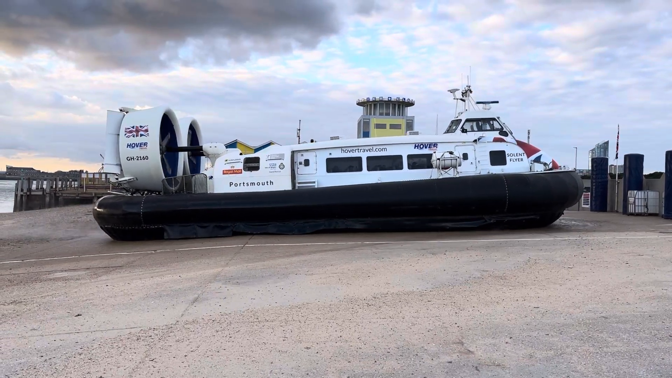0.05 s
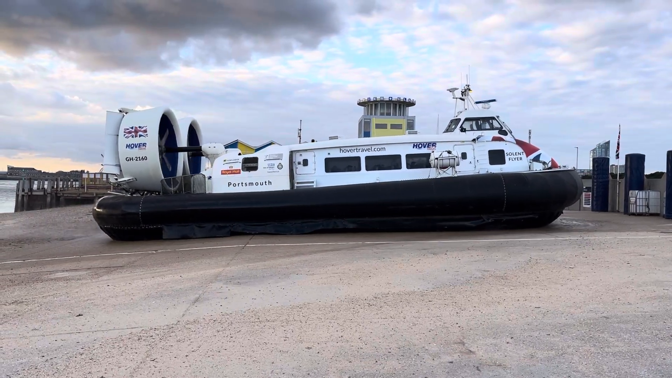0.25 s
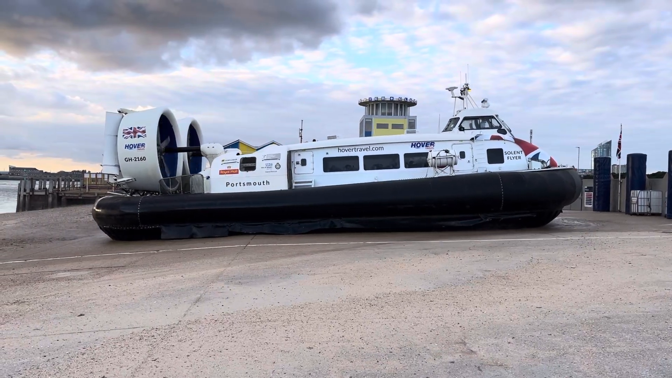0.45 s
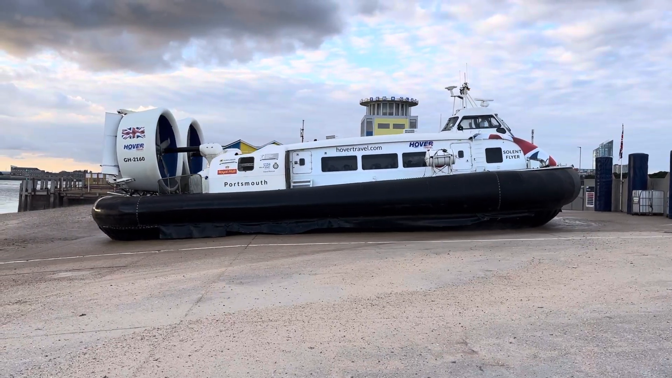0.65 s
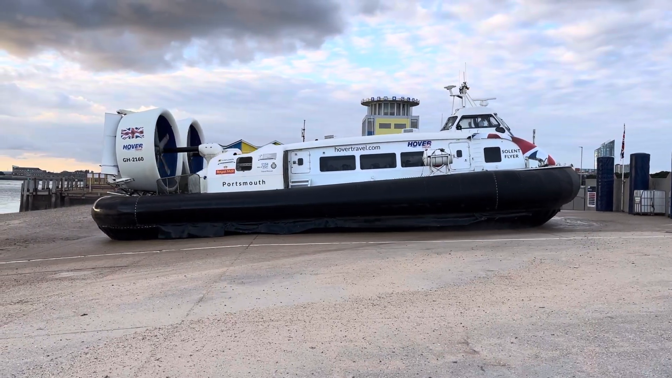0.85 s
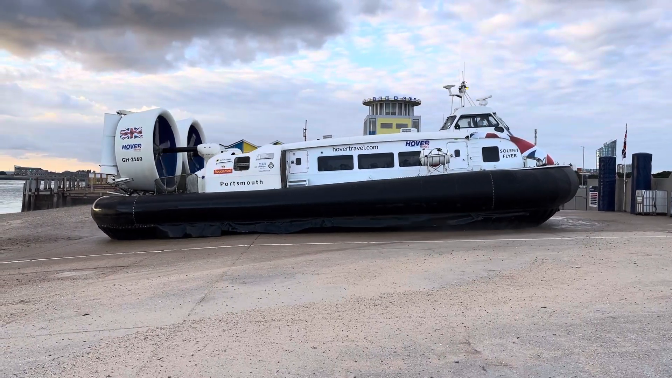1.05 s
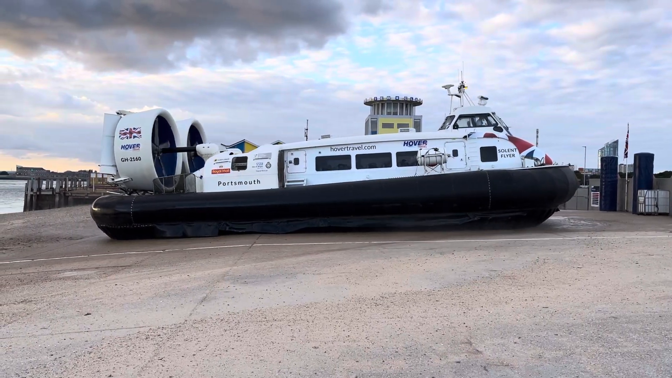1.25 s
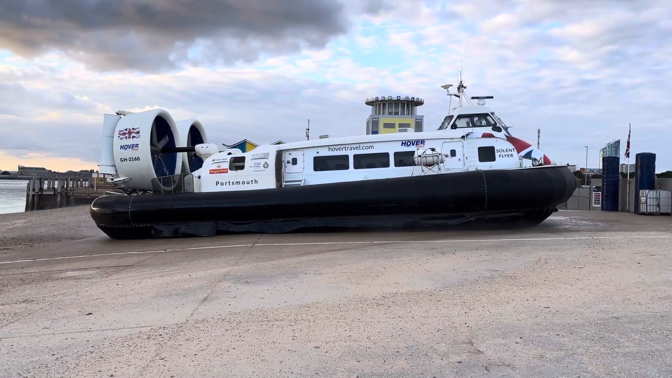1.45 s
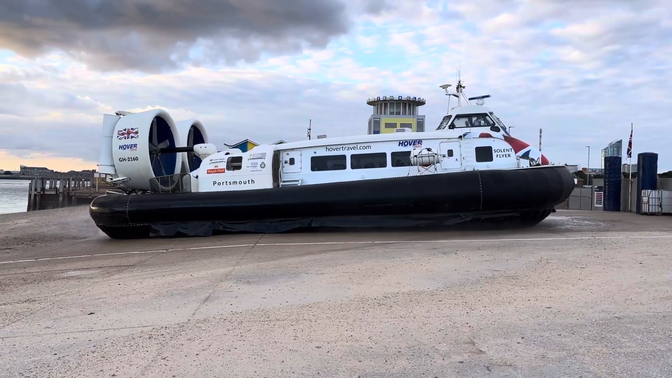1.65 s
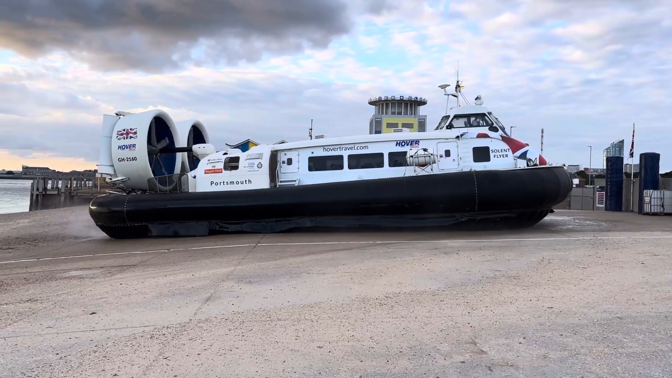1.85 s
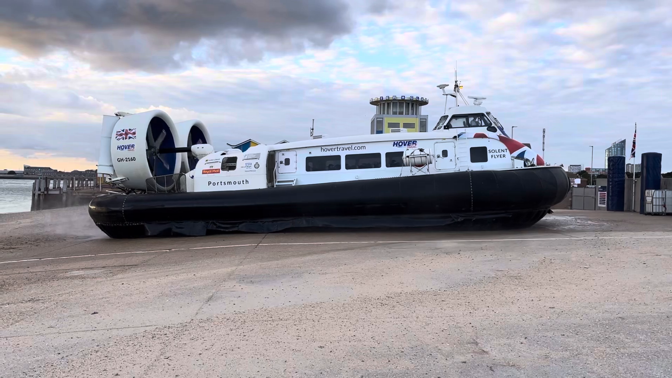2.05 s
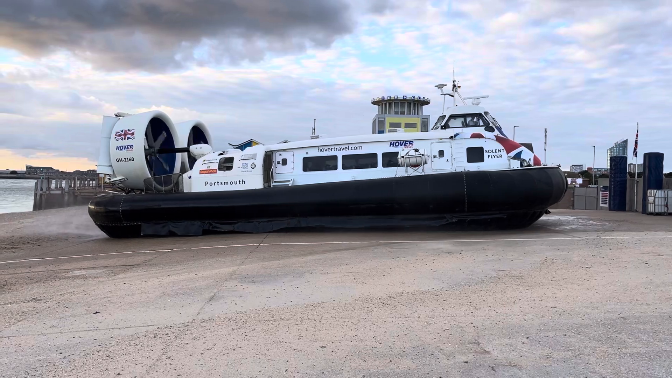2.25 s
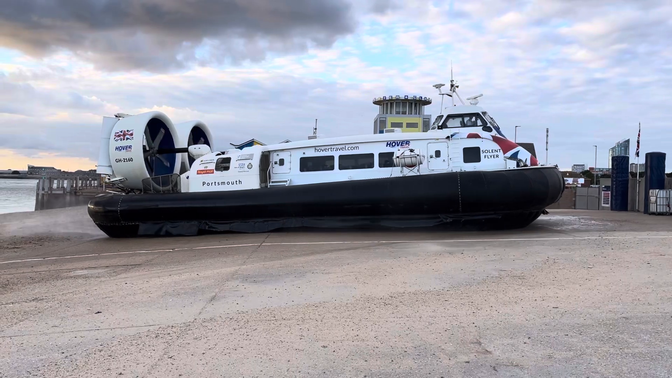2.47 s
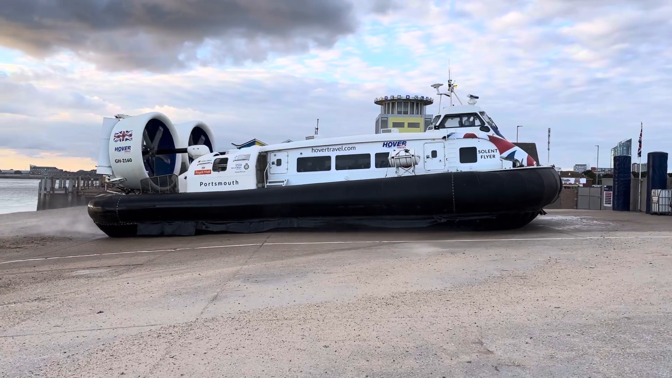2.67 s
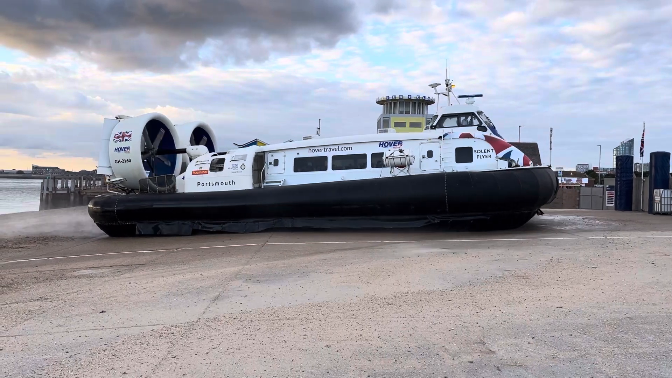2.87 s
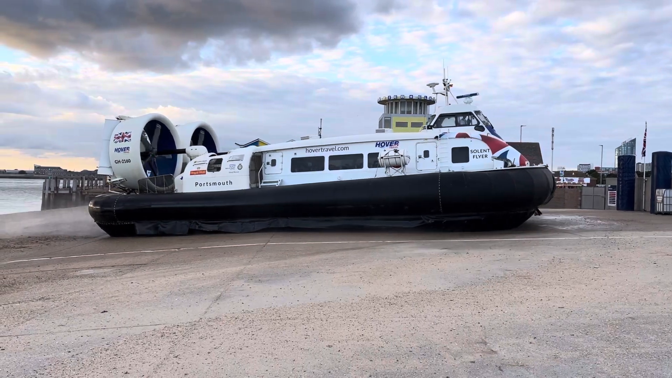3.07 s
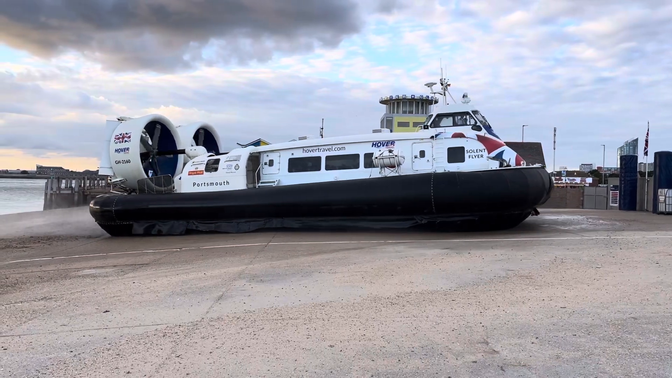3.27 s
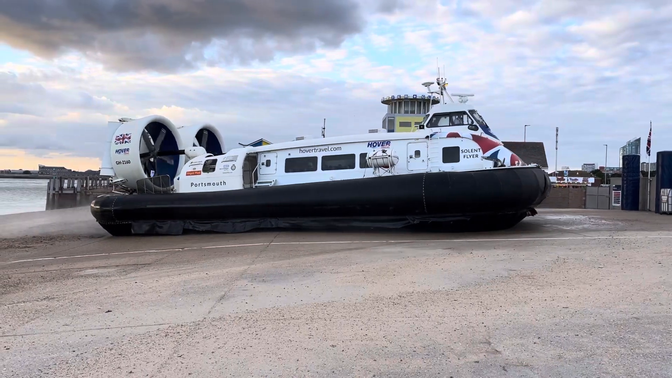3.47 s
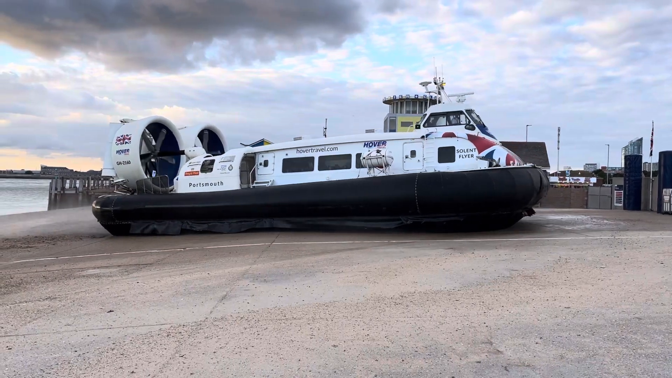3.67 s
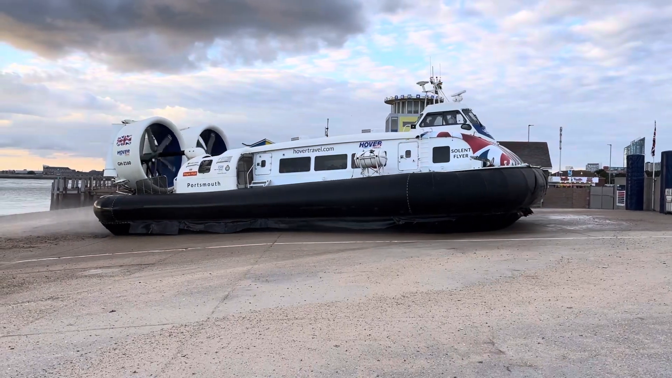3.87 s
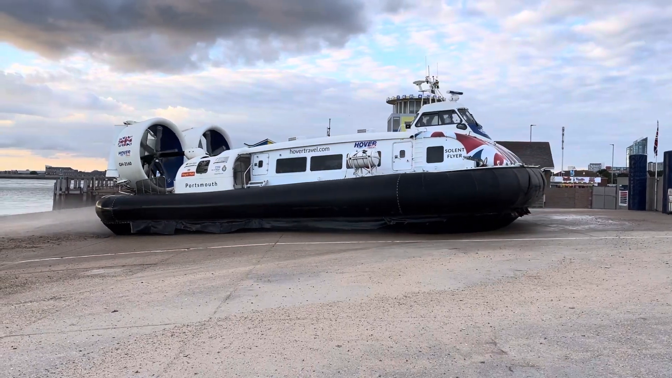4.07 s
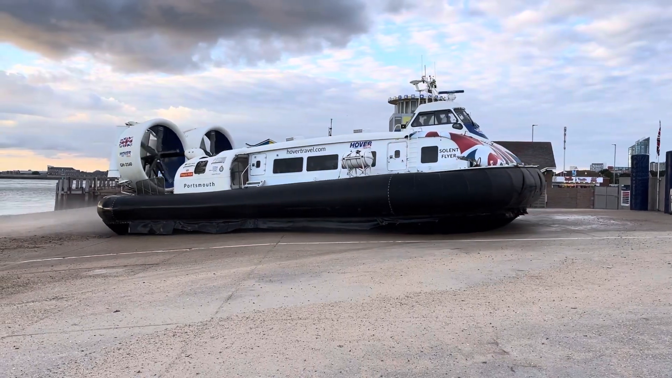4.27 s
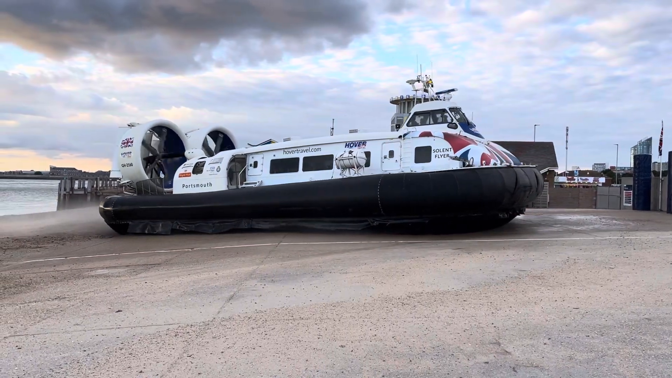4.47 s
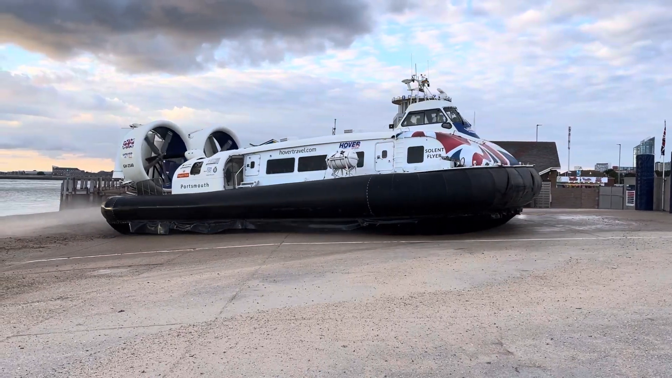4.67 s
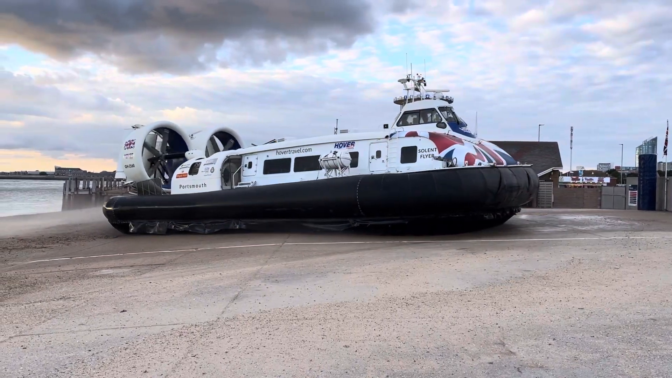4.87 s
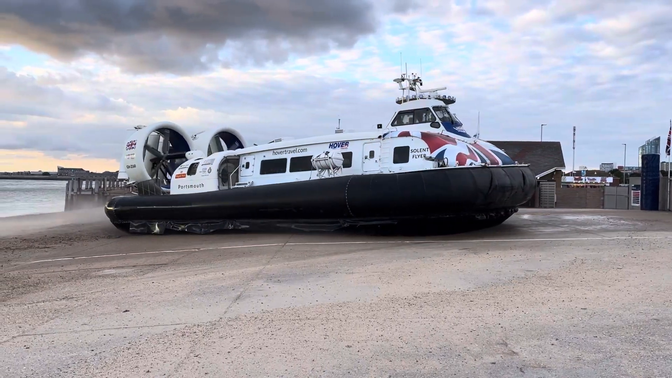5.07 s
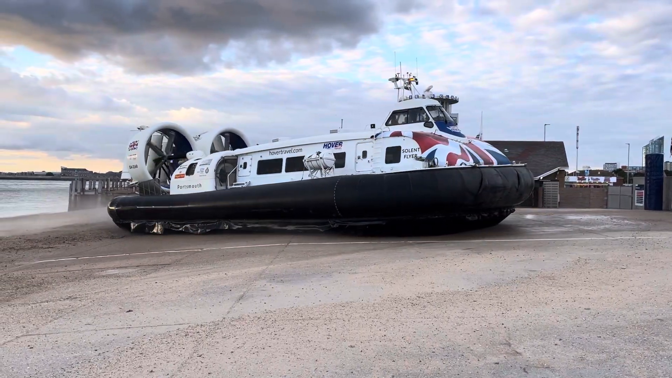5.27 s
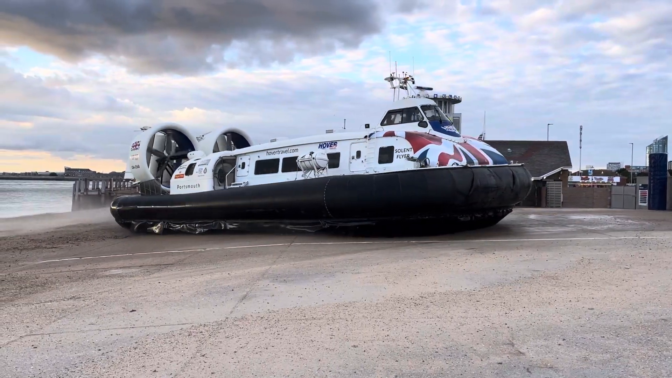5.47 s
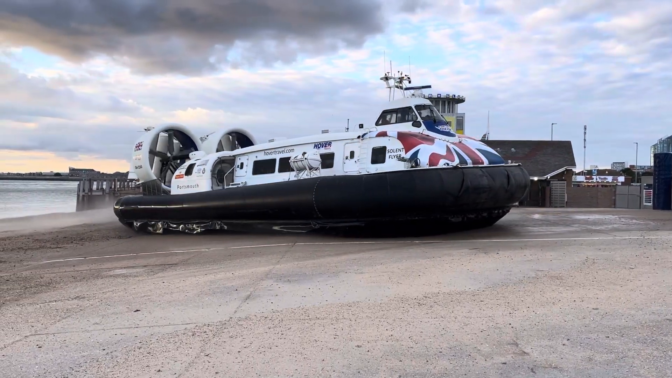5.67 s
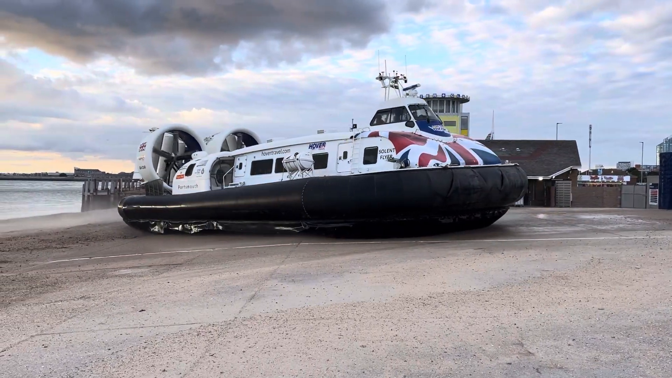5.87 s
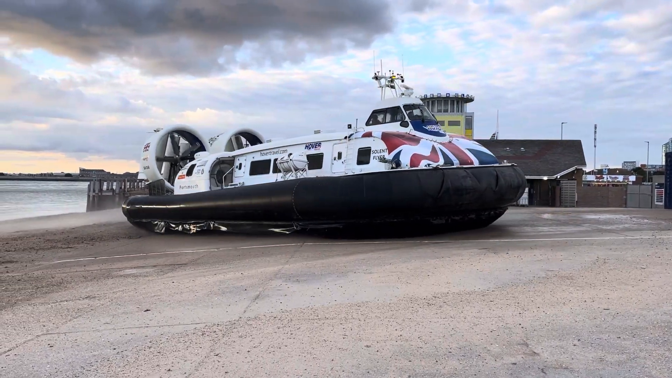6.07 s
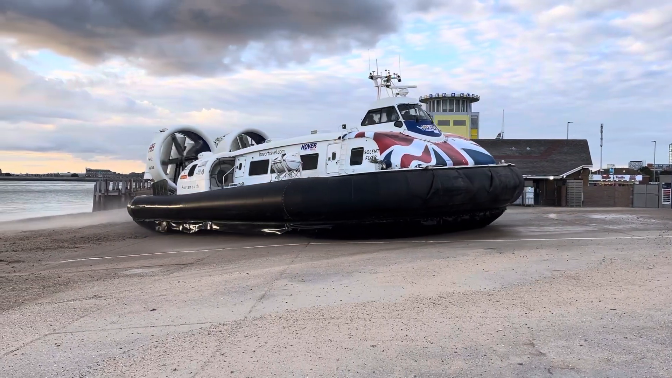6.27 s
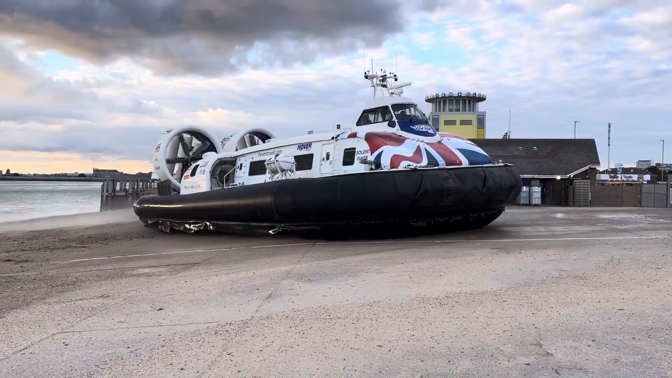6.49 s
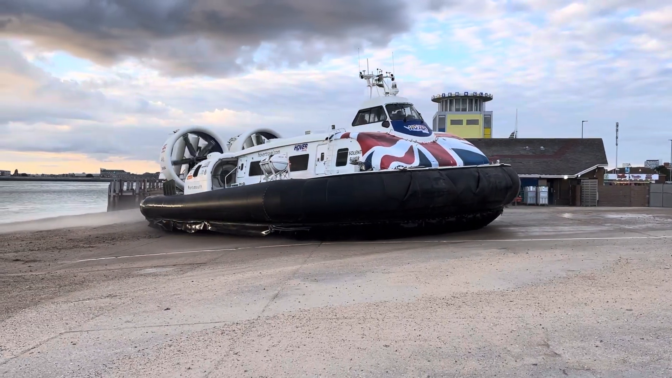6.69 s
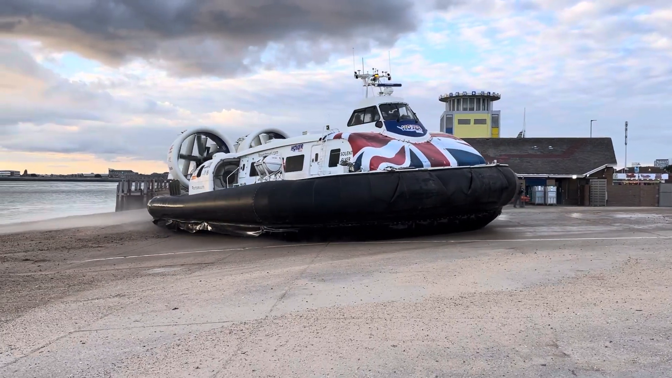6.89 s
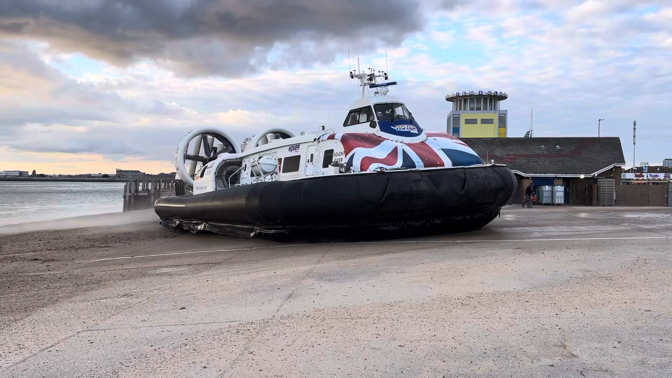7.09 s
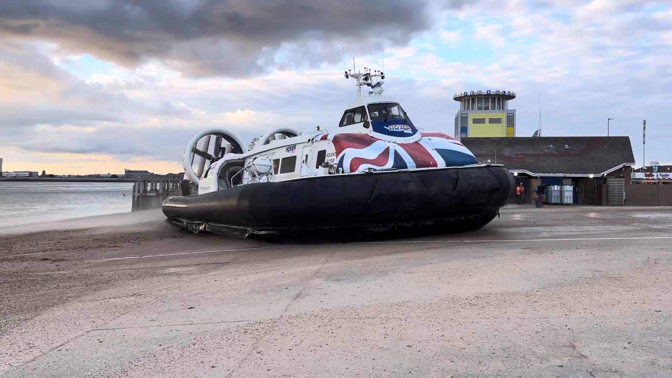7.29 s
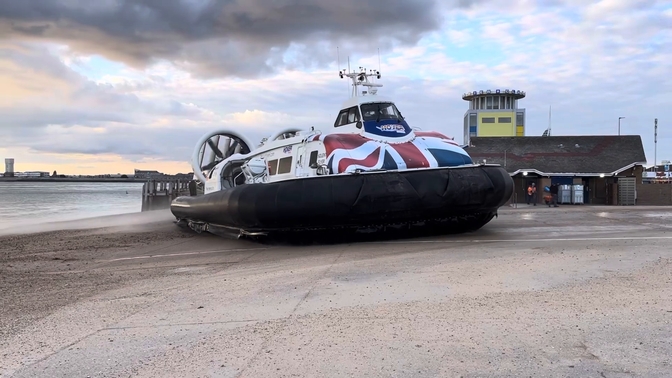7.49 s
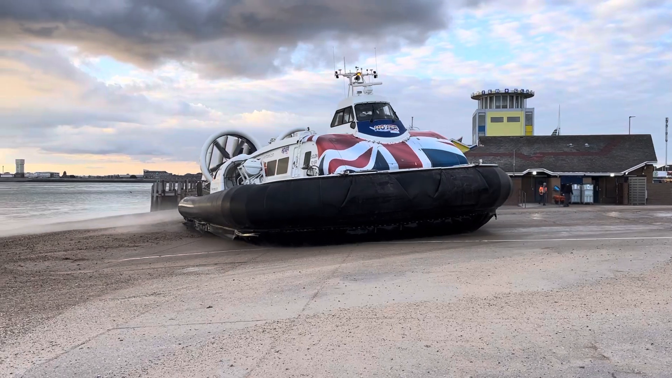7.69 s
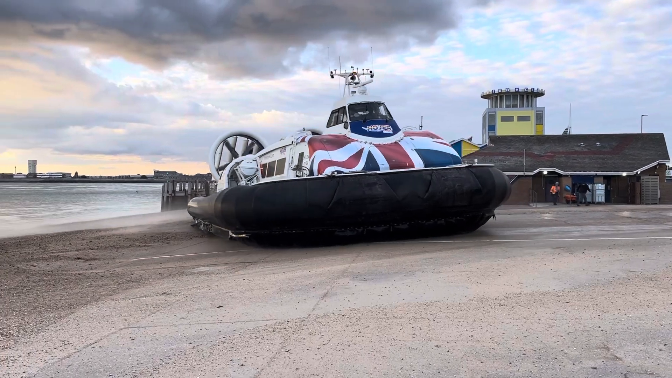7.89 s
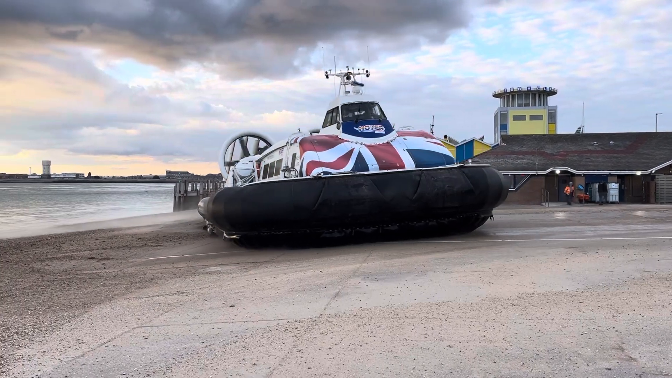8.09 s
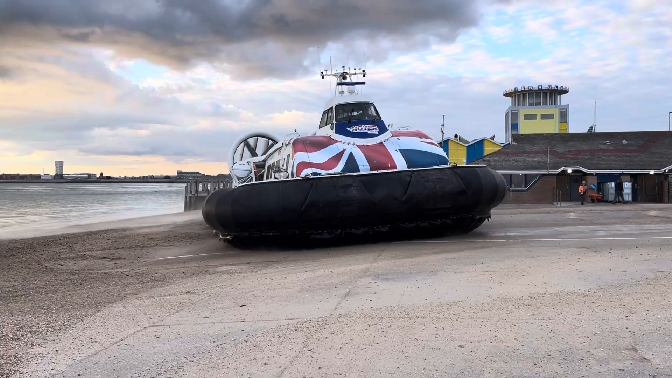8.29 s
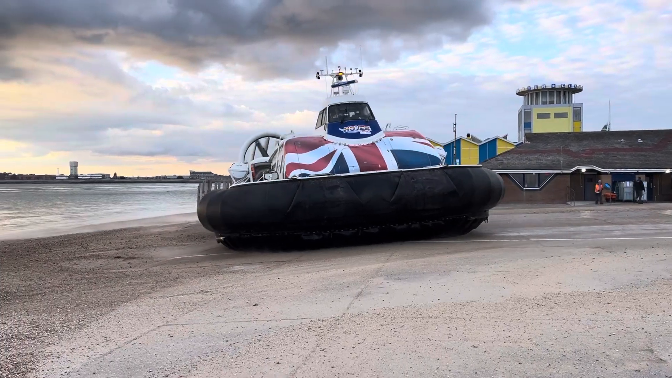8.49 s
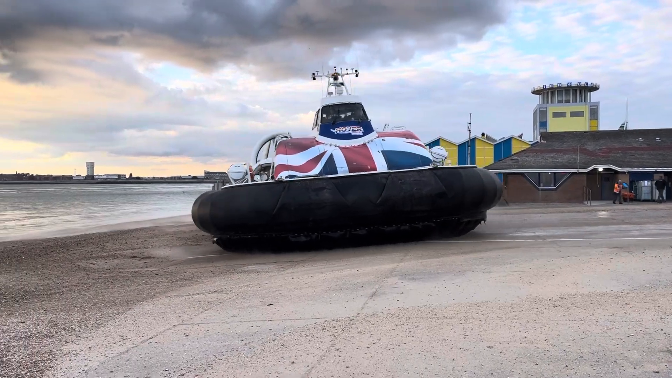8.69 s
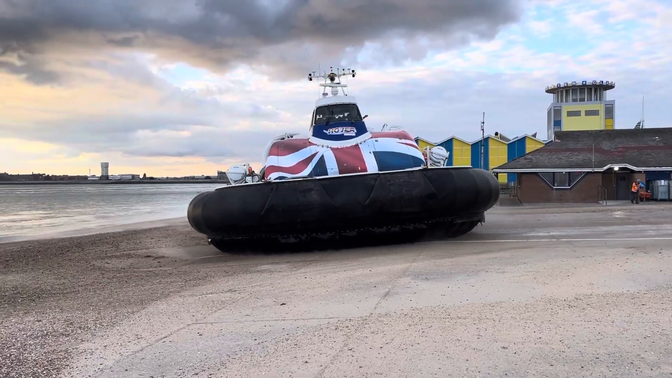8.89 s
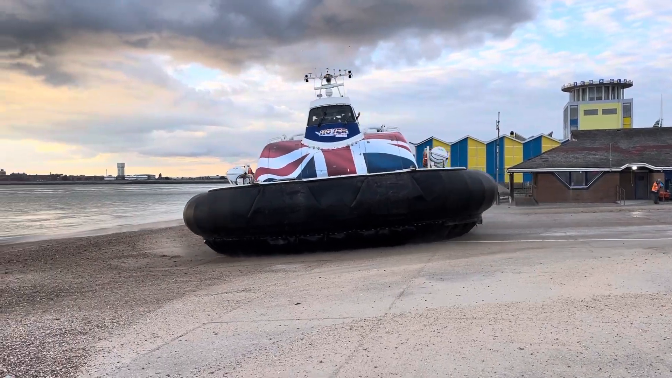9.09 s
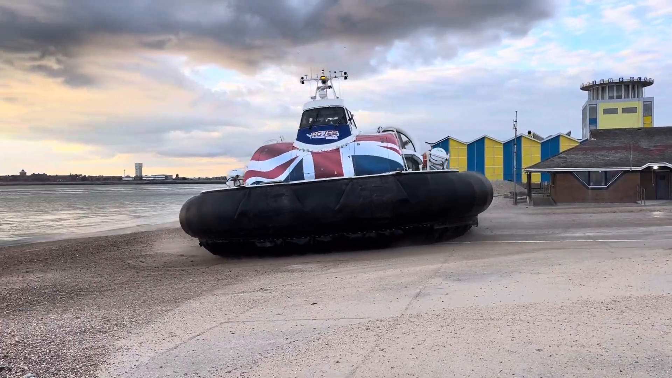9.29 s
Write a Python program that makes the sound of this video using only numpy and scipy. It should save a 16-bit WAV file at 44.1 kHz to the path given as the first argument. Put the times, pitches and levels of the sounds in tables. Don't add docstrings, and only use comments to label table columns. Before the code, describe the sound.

Continuous, loud hovercraft noise in the open, heard from the shingle nearby through a small stereo device with dulled extreme treble. Low engine tone, buzzing propeller harmonics and a faint lift fan whine waver within dense rushing air. Early thrust surges give way to broad skirt hisses; the exhaust fades behind the hull, then comes back as spray rises.

```python
import sys
import numpy as np
from scipy import signal
from scipy.fft import rfft, irfft
from scipy.io import wavfile
from scipy.ndimage import uniform_filter1d

SR = 44100
rng = np.random.default_rng(int(sys.argv[2]) if len(sys.argv) > 2 else 0)


def master_out(mix):
    frames = np.transpose(np.atleast_2d(mix))
    ceiling = np.clip(frames, -1, 1)
    pcm = np.round(ceiling * 32767).astype(np.int16)
    wavfile.write(sys.argv[1], SR, pcm)


def invert_db(level):
    return 10 ** (np.asarray(level, dtype=float) / 20)


N = 411894


def in_time(rows):
    s, *columns = np.transpose(rows)
    return [np.interp(np.arange(N) / SR, s, column) for column in columns]


def at_hz(table, hz, axis=1):
    table = np.array(table)
    return np.interp(np.log(hz + 1), np.log(table[:, 0]), table[:, axis])


def drift(rate):
    r = np.exp(-80 * np.pi * rate / SR)
    coarse = rng.standard_normal(N // 40 + 4002)
    slow = signal.lfilter([1], [1, -2 * r, r * r], coarse)[4000:]
    return np.interp(np.arange(N) / 40, np.arange(len(slow)), slow / slow.std())


def swells(rows, s):
    return sum(height * np.exp(-.5 * ((s - centre) / width) ** 2) for centre, width, height in rows)


def tone(hz, level_db, waver_db, smear):
    phase = 2 * np.pi * (np.cumsum(hz) / SR + rng.random()) + smear * drift(3.9)
    height = np.sqrt(2) * invert_db(level_db + waver_db * drift(5.8))
    return height * np.sin(phase)


# (level broadside [dB], level bow on [dB])
TONE_FLOORS = [(-34, -43), (-30, -33), (-36, -47), (-28, -38), (-38.5, -43), (-49.5, -51), (-39.5, -37.5)]
# (time [s], width [s], level [dB])
TONE_BEAMS = [
    [(.1, 0.21, -28.5), (3.4, 0.12, -25), (5.95, 0.2, -33)],
    [(1.7, 0.22, -23), (3.35, 0.19, -20), (4.4, 0.11, -20), (5.3, 0.14, -29), (7.3, 0.19, -28)],
    [(.6, 0.46, -22.5), (1.2, 0.12, -24.5), (2.1, 0.13, -21), (2.7, 0.34, -19), (3.7, .12, -22),
     (4.6, 0.22, -25.5), (5.25, 0.095, -26.5), (6.1, 0.25, -22), (7.25, 0.1, -27)],
    [(1.28, 0.14, -24), (3.97, 0.12, -21), (5.0, 0.16, -27.5), (6.91, 0.33, -27.5), (.5, .15, -26.5)],
    [(2.37, 0.14, -30), (3.85, 0.34, -25.5), (6.9, 0.26, -31), (.1, 0.15, -33)],
    [(2.8, 0.58, -32), (3.9, .25, -41)],
    [(2.6, 0.17, -31), (3.75, 0.18, -30.5), (4.5, .15, -32), (6.2, 0.67, -31.5), (7.5, 0.49, -35.5),
     (8.8, 0.24, -32.5)],
]


def beamed(index):
    s = np.arange(0, N, 64) / SR
    floor_db = np.interp(s, [0, N / SR], TONE_FLOORS[index])
    beams = [(centre, width, invert_db(2 * db)) for centre, width, db in TONE_BEAMS[index]]
    power = invert_db(2 * floor_db) + swells(beams, s)
    return np.interp(np.arange(N) / SR, s, 10 * np.log10(power))


# (time [s], level [dB])
EXHAUST = [(0, -12.5), (.7, -14), (1.15, -17.5), (1.45, -16), (2.25, -20.5), (2.9, -17.5), (3.35, -14),
           (4.2, -15.5), (4.45, -17.5), (4.65, -30), (5.0, -25), (5.5, -26.5), (5.9, -46), (6.3, -25),
           (7.0, -31.5), (8.3, -36), (8.75, -23.5), (9.34, -22.5)]
# (cycle order [1], level [dB])
CYLINDERS = [(5, -30), (7, -34), (9, -35), (11, -38), (13, -34)]
CYLINDERS_LOST_DB = 5


def diesel(firing_hz):
    first_db, = in_time(EXHAUST)
    second_db = beamed(0) - 1.5
    out = tone(firing_hz, first_db, waver_db=.5, smear=.08)
    out += tone(2 * firing_hz, second_db, waver_db=1.0, smear=.16)
    cycle_hz = firing_hz / 6
    shade_db = CYLINDERS_LOST_DB * np.linspace(.5, -.5, N)
    for order, db in CYLINDERS:
        swing_db = 2.64 * drift(1.17) + shade_db
        out += tone(order * cycle_hz, db + swing_db, waver_db=1.0, smear=.75)
    return out


PROPELLER_RATIO, LIFT_RATIO = .7845, 3.424


def rotors(firing_hz):
    *harmonics, lift_db = map(beamed, range(1, len(TONE_BEAMS)))
    out = tone(LIFT_RATIO * firing_hz, lift_db + 1, waver_db=2.2, smear=.6)
    blade_hz = PROPELLER_RATIO * firing_hz
    for k, db in enumerate(harmonics, 1):
        out += tone(k * blade_hz, db - 1.5, waver_db=.8, smear=.08 * k)
    return out


# (frequency [Hz], density [dB per Hz])
AIR_COLOUR = [(22, -37), (32, -21), (45, -4), (75, -4), (345, -9), (375, -13.5), (520, -12), (850, -13.5),
              (1080, -18), (1380, -17), (1600, -20), (1900, -18.5), (2300, -24.5), (3600, -27.5),
              (5200, -32)]
AIR_DB = -19.5
# (frequency [Hz], loss over the turn [dB], share of surges [1],
# share of heaves [1], share of spray [1])
AIR_PARTS = [(40, 0.1, 0.1, 0.1, -0.12), (100, 3.5, .1, .1, -0.17), (650, 7, .6, 0.1, -0.051),
             (990, 2.5, .8, 0.11, -0.92), (1400, 4, 1.14, 0.1, 0.53), (1950, 2.5, .9, .1, -0.053),
             (2560, 3.5, 0.85, 0.1, -0.16), (2890, 10.5, 0.23, 0.33, -0.4), (5200, 5.5, .2, 0.68, -.1),
             (7100, 8.5, .1, 1.15, -.3), (7900, 8.5, .1, 0.65, 1.3), (9100, 9.5, .1, .4, 0.3),
             (11500, 10.5, .1, .3, 0.19)]
# (time [s], width [s], level [dB])
SURGES = [
    (.88, 0.051, 4),
    (1.5, 0.15, 3.5),
    (1.72, 0.087, 2.5),
    (3.8, 0.17, 1.5),
    (5.8, 0.44, 1),
]
# (time [s], width [s], level [dB])
HEAVES = [
    (.45, .3, 1),
    (1.45, 0.21, 1),
    (4.15, 0.52, 6),
    (5.65, 0.31, 6.5),
    (7.1, 0.41, 5),
    (8.5, .3, 2.5),
]
# (time [s], width [s], level [dB])
SLACKS = [
    (2, 0.52, -1),
    (4.85, 0.83, -1.5),
]
SPRAY = [(8.4, .47, 4.5)]


def air():
    hz, s, cells = signal.stft(rng.standard_normal((2, N)), SR, nperseg=512)
    part_hz, lost_db, surge, heave, spray = np.transpose(AIR_PARTS)[:, :, None]
    parts_db = lost_db * (.5 - s * SR / N)
    parts_db = parts_db + surge * swells(SURGES, s) + heave * swells(HEAVES, s)
    parts_db = parts_db + swells(SLACKS, s) + spray * swells(SPRAY, s)
    parts_db = parts_db - parts_db.mean(axis=1, keepdims=True)
    index = np.arange(len(parts_db))
    place = np.interp(np.log(hz + 1), np.log(part_hz[:, 0]), index)
    weights = np.clip(1 - abs(place[:, None] - index), 0, 1)
    patches = uniform_filter1d(rng.standard_normal(cells.shape[1:]), size=24, axis=0)
    patches = uniform_filter1d(patches, size=7, axis=1)
    flutter_db = 1.3 * np.clip(hz / 9000, .15, 1.2)[:, None]
    gust_db = flutter_db * patches / patches.std()
    strands = signal.istft(cells * invert_db(weights @ parts_db + gust_db), SR, nperseg=512)[1][:, :N]
    colour = invert_db(at_hz(AIR_COLOUR, np.fft.rfftfreq(N, 1 / SR)))
    strands = irfft(rfft(strands) * colour, N)
    return invert_db(AIR_DB) * strands / strands.std()


# (time [s], firing rate [Hz])
ENGINE_SPEED = [(0, 88.6), (.33, 88.6), (.99, 90.3), (1.32, 90.7), (1.98, 88.5), (2.31, 88.1), (3.1, 88.1),
                (3.3, 88.4), (3.96, 90.4), (4.29, 90.2), (4.95, 88.7), (5.61, 88.8), (6.27, 88.2),
                (6.6, 88.5), (7.26, 90.2), (7.92, 90.1), (8.58, 89.4), (9.34, 89.2)]
# (frequency [Hz], likeness [0-1], left over right [dB],
# right leads by [rad])
PORTS = [(40, .998, 1.0, 0), (100, .995, 1.7, 0), (250, .96, 2, 0), (550, .9, 3, -.1), (900, .9, -.5, .1),
         (1150, .65, 4.5, -.75), (1350, .75, 3.5, -.3), (1550, .45, 3, -1.3), (1800, .7, 5.4, -1.2),
         (2400, .95, .5, -.1), (4900, .93, 0, 0), (8000, .78, 0, 0)]
# (frequency [Hz], phase [rad])
PORT_TURN = [(4900, 0), (5700, 3.1), (6500, 3.3), (7000, 6.2), (7800, 6.1), (8300, 5), (9600, 3.1),
             (10600, 2.3), (11750, .3), (12400, 0), (13200, -.7), (14600, -3.1)]
# (frequency [Hz], level [dB])
HOUSING = [(5200, 0), (6400, 2.5), (7000, 1.5), (8150, -7), (8700, -5), (10000, -7), (11700, -11.5),
           (13200, -13.5), (15800, -19)]


def scene():
    firing_hz, = in_time(ENGINE_SPEED)
    direct, scattered = air()
    direct = rfft(direct + diesel(firing_hz) + rotors(firing_hz))
    scattered = rfft(scattered)
    hz = np.fft.rfftfreq(N, 1 / SR)
    alike = np.clip(at_hz(PORTS, hz), 0, 1)
    lean = invert_db(at_hz(PORTS, hz, axis=2) / 2)
    turn = np.exp(1j * (at_hz(PORTS, hz, axis=3) + at_hz(PORT_TURN, hz)))
    right = (alike * direct + np.sqrt(1 - alike ** 2) * scattered) * turn
    ports = np.array([direct * lean, right / lean])
    return irfft(invert_db(at_hz(HOUSING, hz)) * ports, N)


# (low edge [Hz], high edge [Hz])
SUM_GAPS = [(5420, 6650), (9200, 10450), (13780, 22050)]
# (low edge [Hz], high edge [Hz])
DIFFERENCE_GAPS = [(2330, 5100), (6730, 8250), (11620, 13100), (15700, 22050)]
# (0 sum or 1 difference, low edge [Hz], high edge [Hz],
# share of frames [0-1])
KEPT_STRIPS = [(0, 9300, 10450, .012), (0, 13900, 15800, .007), (1, 2300, 2600, .3), (1, 2600, 2950, .03),
               (1, 4200, 5100, .008), (1, 7550, 8250, .025)]


def weak_bands(dry):
    sum_difference = np.array([dry[0] + dry[1], dry[0] - dry[1]]) / 2
    hz, s, cells = signal.stft(sum_difference, SR, nperseg=2048)
    hz = hz[:, None]
    empty = np.zeros(cells.shape, bool)
    for k, gaps in enumerate((SUM_GAPS, DIFFERENCE_GAPS)):
        for low, high in gaps:
            shift_hz = np.round(rng.normal(0, .8, (2, len(s)))) * [[low / 75], [55]]
            empty[k] |= (hz > low + shift_hz[0]) & (hz < high + shift_hz[1])
    for k, low, high, share in KEPT_STRIPS:
        empty[int(k)] &= ~((hz >= low) & (hz < high) & (rng.random(len(s)) < share))
    both, apart = signal.istft(cells * ~empty, SR, nperseg=2048)[1][:, :N]
    return np.array([both + apart, both - apart])


def low_pass(x):
    return signal.sosfilt(signal.butter(12, 15850, fs=SR, output="sos"), x)


def record(dry):
    rounded = np.sign(dry) * (.6 + .33 * np.tanh((abs(dry) - .6) / .33))
    mix = weak_bands(np.where(abs(dry) < .6, dry, rounded))
    return low_pass(mix)


dry = scene()
out = record(dry)
master_out(out)
```